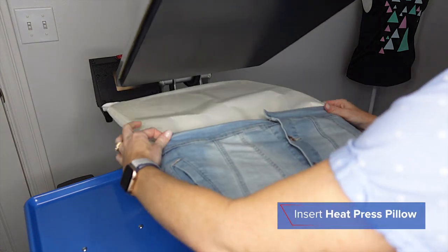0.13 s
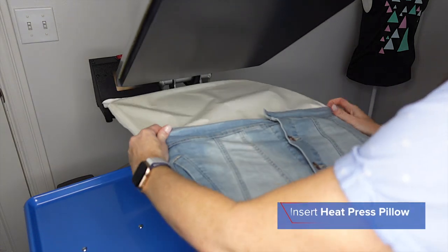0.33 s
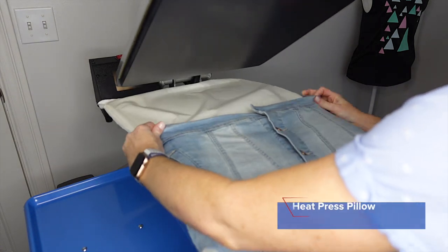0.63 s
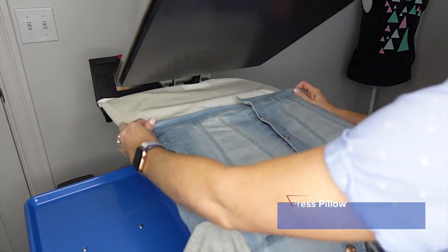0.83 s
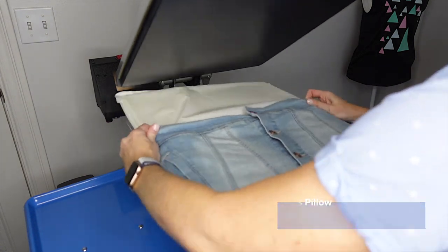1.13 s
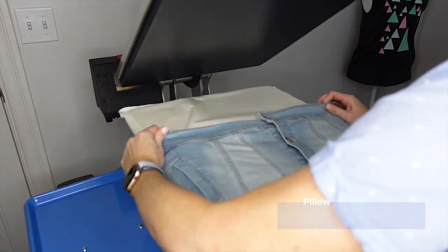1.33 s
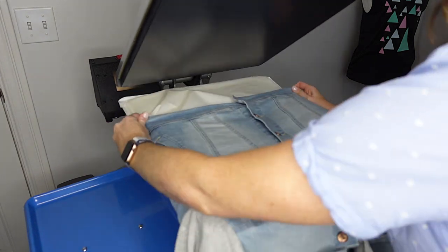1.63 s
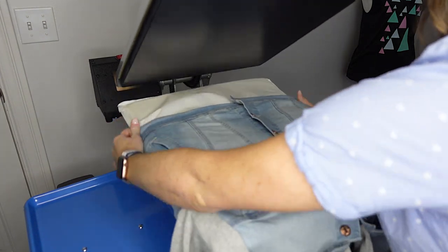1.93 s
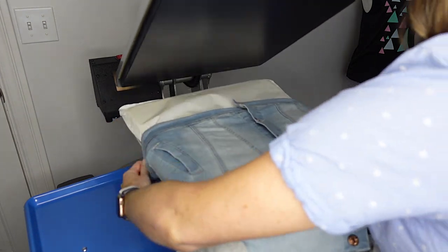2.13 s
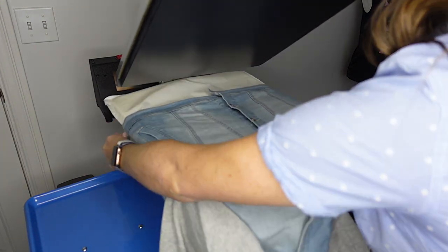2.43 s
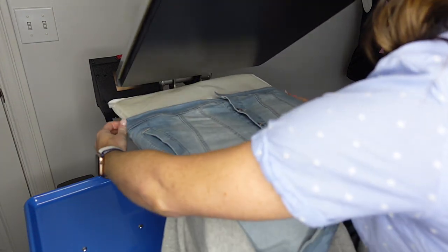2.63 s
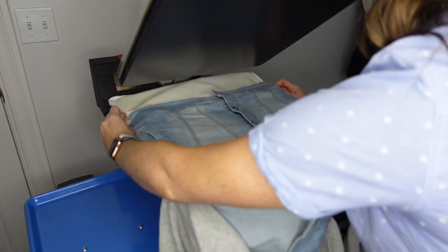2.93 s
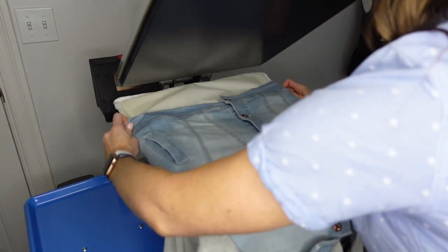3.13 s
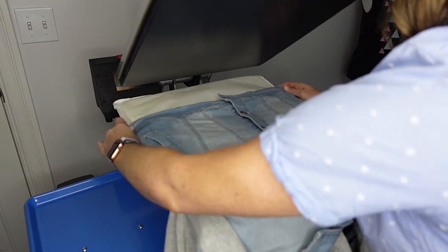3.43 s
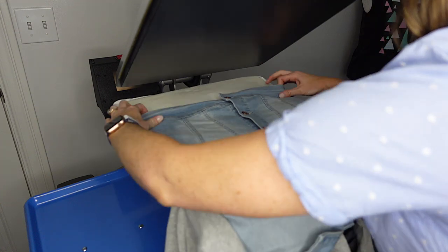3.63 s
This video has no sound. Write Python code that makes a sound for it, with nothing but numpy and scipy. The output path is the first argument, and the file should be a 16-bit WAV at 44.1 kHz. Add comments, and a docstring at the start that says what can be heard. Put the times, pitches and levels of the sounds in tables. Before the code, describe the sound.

Heavy denim rubbed and tugged over a padded plate, with dull fold pops and dry seam snaps

```python
"""Dull cloth rubbing and crumpling, close to the microphone in a small room, with a treble hiss from the weave.
A denim jacket is tugged and smoothed over the padded plate of a heat press: shaped noise and grains slide,
folds buckle as short sinking swings, seams snap as noise bursts, and scuffs drag in single bands.
Now and then the cloth sticks and slips in a short judder or squeak of wandering pitch.
Behind it lie a low handling rumble, faint room noise and a steady mains hum."""
import sys
import numpy as np
from scipy import signal
from scipy.fft import rfft, irfft, next_fast_len
from scipy.io import wavfile
from scipy.ndimage import map_coordinates

SR = 44100
rng = np.random.default_rng(int(sys.argv[2]) if len(sys.argv) > 2 else 0)


def generate_wav(sig):
    """Save sig (samples, or channels by samples) to the path in sys.argv[1] as 16-bit PCM at SR."""
    pcm = np.round(np.clip(np.atleast_2d(sig).T, -1, 1) * 32767).astype(np.int16)
    wavfile.write(sys.argv[1], SR, pcm)


N = 167580  # samples, 3.8 s

# Colour of the treble hiss of the weave. Each row: frequency in Hz, relative level in dB.
WEAVE_COLOUR = [(200, -18), (1500, 4), (2900, 1), (4400, 3), (6500, -3), (9000, -4), (13000, -0.5),
                (15800, -9.5)]


def amp(db):
    """Decibels to gain."""
    return 10 ** (np.asarray(db) / 20)


def unit(x):
    """Scale to rms 1."""
    return x / np.sqrt(np.mean(x ** 2) + 1e-20)


def curve(rows):
    """One value per sample, straight lines between (s, value) rows."""
    return np.interp(np.arange(N) / SR, *np.transpose(rows))


def wobble(rate):
    """A smooth random curve, rate knots a second."""
    knots = rng.standard_normal(4096)
    return map_coordinates(knots, [np.arange(N) * rate / SR], mode="wrap")


def coloured(x, points, tilt_db=0):
    """Causal minimum-phase filter through (Hz, dB) points; tilt_db per octave acts from 3 to 8 kHz."""
    m = 2 * next_fast_len(len(x))
    octave = np.log2(np.fft.rfftfreq(m, 1 / SR) + 1)
    hz, db = np.transpose(points)
    tilt_octaves = np.clip(octave, np.log2(3000), np.log2(8000)) - np.log2(3000)
    gain_db = np.interp(octave, np.log2(hz), db) + tilt_db * tilt_octaves
    # folding the cepstrum onto positive time makes the filter causal
    cepstrum = irfft(np.log(amp(gain_db)))
    cepstrum[1:m // 2] *= 2
    cepstrum[m // 2 + 1:] = 0
    return irfft(rfft(x, m) * np.exp(rfft(cepstrum)))[:len(x)]


def noise(points):
    """Coloured noise of rms 1."""
    return unit(coloured(rng.standard_normal(N), points))


def grains(rate, spread_db, points):
    """Random tiny impulses of uneven size, about rate a second, coloured, rms 1."""
    size_db = spread_db * np.minimum(rng.exponential(size=N), 4)
    sizes = amp(size_db) * rng.choice([-1, 1], N)
    struck = rng.random(N) < rate / SR
    return unit(coloured(sizes * struck, points))


def burst(shape):
    """Noise under an envelope, its spectrum flattened so that no frequency stands out."""
    z = rfft(rng.standard_normal(len(shape)) * shape, 2 * len(shape))
    flat = irfft(np.exp(1j * np.angle(z)))[:len(shape)]
    return flat * np.sqrt(np.sqrt(shape))


def add(track, s, sound):
    """Mix a sound into the track from time s."""
    i = max(round(s * SR), 0)
    track[i:i + len(sound)] += sound[:max(N - i, 0)]


def sliding():
    """Cloth over cloth: a dull rub with small crumples, the rasp of the ribs, and the hiss and tick of fibres."""
    # How hard the cloth rubs. Each row: time in seconds, level in dB before the layer trims.
    rub_level = [(0.0, -32), (0.09, -49), (0.12, -38.5), (0.26, -42), (0.29, -43), (0.34, -42.5),
                 (0.42, -44.5), (0.48, -36), (0.55, -36), (0.6, -46.5), (0.67, -44.5), (0.78, -37.5),
                 (0.92, -37.5), (0.96, -34.5), (1.03, -45), (1.085, -43), (1.12, -37), (1.28, -39),
                 (1.4, -41.5), (1.44, -36), (1.48, -41.5), (1.56, -31), (1.62, -40.5), (1.67, -36),
                 (1.86, -35.5), (1.9, -47.5), (2.05, -35.5), (2.16, -50.5), (2.27, -49), (2.32, -38.5),
                 (2.42, -36.5), (2.56, -48), (2.63, -47), (2.74, -58), (2.79, -52.5), (2.84, -44.5),
                 (2.95, -50.5), (3.09, -39), (3.25, -34), (3.36, -42), (3.41, -33), (3.55, -56),
                 (3.59, -41.5), (3.7, -43.5), (3.75, -52.5), (3.8, -41)]
    # Raspy upper mids, where ribs of the weave catch. Each row: time in seconds, level in dB before trims.
    rasp_level = [(0.0, -42.5), (0.09, -53), (0.18, -47.5), (0.26, -54.5), (0.47, -56), (0.6, -54),
                  (0.73, -49.5), (0.9, -53), (0.95, -45), (1.01, -56), (1.27, -46), (1.32, -49.5),
                  (1.47, -50), (1.51, -40.5), (1.61, -48.5), (1.79, -43), (1.92, -54.5), (2.07, -50.5),
                  (2.16, -59.5), (2.28, -63), (2.335, -46), (2.43, -49.5), (2.48, -53.5), (2.74, -64),
                  (2.88, -56.5), (3.02, -62), (3.05, -50.5), (3.36, -52), (3.39, -46.5), (3.55, -62),
                  (3.65, -75), (3.8, -72)]
    # Treble hiss of the weave. Each row: time in seconds, level in dB before trims.
    hiss_level = [(0.0, -50.5), (0.06, -71), (0.18, -56.5), (0.26, -75), (0.29, -62), (0.56, -63),
                  (0.59, -64.5), (0.73, -58.3), (1.0, -60), (1.23, -59), (1.34, -60.5), (1.59, -54.5),
                  (1.62, -58), (1.79, -54), (1.86, -54.5), (1.89, -64), (1.96, -65), (2.02, -58.5),
                  (2.08, -56), (2.13, -64), (2.27, -66.5), (2.34, -57), (2.41, -53.5), (2.48, -62),
                  (2.51, -57), (2.55, -62), (2.73, -67), (3.06, -62), (3.42, -61), (3.56, -64.5),
                  (3.62, -56), (3.69, -63.5), (3.75, -60.5), (3.8, -59.5)]
    # Colours of the rub and the rasp. Each row: frequency in Hz, relative level in dB.
    rub_colour = [(20, -15), (70, -14), (150, -6.5), (280, -1.5), (380, -2.5), (550, -1.5), (820, -3),
                  (1130, -16), (1550, -14.5), (2600, -28.5), (7000, -46)]
    rasp_colour = [(100, -0.5), (700, -8.5), (1400, 2), (2000, -3.5), (2700, -9.5), (4200, -16.5),
                   (7000, -22.5), (15000, -41)]

    rub = amp(-6.5) * noise(rub_colour) + amp(-3.3) * crumples()
    rasp = amp(-8) * noise(rasp_colour)
    rasp += amp(-2.5) * grains(520, 3.5, rasp_colour)  # ribs
    weave = amp(0.5) * noise(WEAVE_COLOUR)
    weave += amp(-8.5) * grains(450, 0.5, WEAVE_COLOUR)  # fibres

    grip_db = 1.66 * wobble(45)  # uneven grip moves all three layers together
    catch_db = 1.8 * wobble(130)  # the ribs catch in quick clumps
    rub *= amp(curve(rub_level) + grip_db)
    rasp *= amp(curve(rasp_level) + 0.67 * grip_db + catch_db)
    weave *= amp(curve(hiss_level) + 0.5 * grip_db)
    return rub + rasp + weave


def crumples():
    """Countless small folds of random pitch and size, rms 1."""
    # Middle pitch of the crumples, higher when the cloth is taut. Each row: time in seconds, pitch in Hz.
    middle_pitch = [(0, 520), (.9, 574), (1.15, 700), (1.35, 477), (2.05, 500), (2.42, 670), (2.85, 516),
                    (3.1, 750), (3.25, 620), (3.8, 655)]
    per_second, spread_db, pitch_octaves, length_cycles = 330, 2.1, 0.55, 1.0

    out, t = np.zeros(N), np.arange(-SR // 100, SR // 100) / SR
    for when, size, phase, *chance in rng.random((int(per_second * N / SR), 6)):
        s = when * N / SR
        octaves = pitch_octaves * np.sum(2 * np.array(chance) - 1)  # three draws, so mostly near the middle
        hz = np.interp(s, *np.transpose(middle_pitch)) * 2 ** octaves
        level_db = -spread_db * np.log(size + 0.061)  # few large, many small
        add(out, s, amp(level_db) * swing(t, hz, length_cycles, phase))
    return unit(out)


def swing(t, hz, length, phase):
    """One fold flipping over: a short swing of air with sinking pitch and no ring."""
    rise_share = 0.73  # the rise is this share of the swing length
    pitch_fall = 0.17  # share of the pitch lost over one swing length as the fold relaxes
    cycles = hz * t
    swell = np.exp(-(cycles / length / np.where(t < 0, rise_share, 1)) ** 2)
    sunk_cycles = cycles - pitch_fall * cycles ** 2 / length / 2
    return swell * np.cos(2 * np.pi * (sunk_cycles + phase))


def press(x):
    """The rubbing sets the body of the press ringing faintly in a few decaying modes."""
    # Resonances of the press. Each row: frequency in Hz, relative level in dB, 60 dB decay time in seconds.
    modes = [(279, -1, .16), (533, -7, .07)]
    t = np.arange(SR // 4) / SR
    ring = np.zeros(len(t))
    for hz, db, t60 in modes:
        evened = 2 * np.log(1000) / (t60 * SR)  # long and short modes answer alike at their own pitch
        ring += amp(db - 60 * t / t60) * np.cos(2 * np.pi * hz * t) * evened
    return x + signal.fftconvolve(x, ring)[:N]


def folds():
    """Big stiff folds buckle, each a short swing of air, one or a few cycles long, heard as a dull pop."""
    # Each row: middle in seconds, level in dB before the trim, pitch in Hz, swing length in cycles.
    pops = [(0.0602, -23, 630, 0.55), (.172, -24, 560, 1.2), (.212, -10.5, 482, 0.68),
            (0.2967, -19, 480, 0.51), (.3295, -26, 840, 0.42), (0.371, -22.5, 590, 1.4),
            (0.4034, -20.5, 517, 0.69), (0.4618, -13.5, 530, 0.9), (.5441, -22.5, 560, 0.87),
            (0.6236, -23, 950, 0.67), (0.7303, -31, 453, .7), (0.7937, -19.5, 607, 1.07),
            (0.8395, -19.5, 556, 1.14), (.9262, -23, 696, 0.78), (0.9433, -19, 617, 1.15),
            (1.0577, -22.5, 696, 0.96), (1.0837, -20.5, 640, 0.78), (1.1092, -15, 720, 0.88),
            (1.139, -18.5, 870, 0.47), (1.1738, -13.5, 765, 0.59), (1.183, -19.5, 510, 0.34),
            (1.263, -28.5, 544, 1.6), (1.2789, -18.5, 480, 0.49), (1.435, -21, 400, 0.9),
            (1.517, -22, 515, 1.2), (1.551, -19, 440, 0.42), (1.5553, -17, 472, 0.9), (1.574, -21, 540, .8),
            (1.6355, -22.5, 590, 0.84), (1.8007, -13.5, 600, 0.9), (1.809, -24, 560, 0.45),
            (1.8471, -23, 680, 0.78), (1.894, -24.5, 645, .6), (1.94, -25, 676, 0.66),
            (1.9702, -19, 786, 1.2), (2.0166, -20, 685, 0.69), (2.0492, -19, 790, 1.2),
            (2.0528, -17, 398, 0.54), (2.3935, -22.5, 905, 1.6), (2.4128, -18, 686, 0.61),
            (2.4345, -20, 745, 1), (2.6208, -27, 795, 1.13), (2.8283, -23, 580, 0.69),
            (2.858, -30, 550, 0.45), (2.93, -32, 490, 0.86), (2.996, -34, 790, 0.94),
            (3.037, -25, 600, 0.5), (3.0645, -19, 760, 1), (3.0942, -23, 785, 2.1),
            (3.1415, -21.5, 660, 0.78), (3.176, -27, 560, 0.46), (3.264, -19, 640, 0.78),
            (3.293, -23, 620, 0.7), (3.354, -26, 900, 0.46), (3.4102, -25, 603, 0.82),
            (3.4565, -24.5, 830, 1.9), (3.6875, -19.5, 525, 0.38), (3.7127, -22.5, 674, 0.59)]
    trim_db = -2.5
    out, t = np.zeros(N), np.arange(-SR // 100, SR // 100) / SR
    for (s, db, hz, length), phase in zip(pops, rng.random(len(pops))):
        add(out, s + t[0], amp(db + trim_db) * swing(t, hz, length, phase))
    return out


def scuffs():
    """Short scuffs of fingers and hems: a brief drag of noise swells and fades in one band."""
    # Each row: middle in seconds, length in seconds, centre in Hz, level in dB before the trim.
    drags = [(.122, 0.012, 950, -40), (0.291, 0.041, 645, -35), (.329, 0.0064, 1640, -37),
             (.37, 0.022, 1600, -44.5), (.785, 0.042, 600, -36.5), (0.794, 0.024, 1840, -38.5),
             (.925, 0.0099, 2030, -38.5), (.95, .045, 3600, -49.5), (1.049, 0.026, 1620, -45),
             (1.15, 0.074, 980, -45), (1.266, 0.025, 1940, -43.5), (1.556, 0.017, 1860, -39),
             (1.558, 0.022, 288, -41), (2.261, .008, 1740, -46), (2.365, 0.06, 243, -38),
             (2.385, 0.032, 510, -37.5), (2.39, 0.026, 1070, -40), (2.413, 0.0069, 1110, -33),
             (2.431, 0.017, 1130, -40), (2.482, 0.0056, 1870, -38.5), (2.595, 0.017, 247, -39),
             (2.656, .014, 1750, -48.5), (2.775, .012, 594, -43.5), (1.5, .05, 2000, -46.5),
             (3.059, 0.032, 1040, -37), (3.146, 0.017, 940, -36.5), (3.239, 0.048, 335, -39),
             (3.342, 0.025, 138, -35.5), (3.39, 0.012, 1390, -30), (3.39, .016, 480, -29),
             (3.41, 0.041, 347, -42), (3.6, 0.079, 4500, -63), (3.62, .035, 12500, -56.5),
             (3.643, 0.0076, 2100, -48), (3.689, 0.015, 318, -34.5), (3.755, .08, 4500, -63)]
    # Band of a scuff. Each row: multiple of the centre frequency, relative level in dB.
    band = [(.1, -44), (.4, -26), (.75, -4), (1, 1.5), (1.25, -10), (1.7, -26), (4, -36), (12, -51)]
    trim_db = -4.5
    out = np.zeros(N)
    for s, length, hz, db in drags:
        swell = np.hanning(int(length * SR))
        padded = np.pad(burst(swell), (0, SR // 50))  # room for the filter to die away
        drag = coloured(padded, np.array(band) * [hz, 1])
        drag *= np.sqrt(len(swell)) / np.linalg.norm(drag)
        add(out, s - length / 2, amp(db + trim_db) * drag)
    return out


def seams():
    """A caught seam lets go with a short, dry, broad crack, each a little different in colour."""
    # Seams and threads. Each row: start in seconds, level in dB before the trim, treble tilt in dB per octave.
    snaps = [(.107, -25.5, -0.5), (0.1753, -24, 0.5), (0.2948, -31.5, 0), (0.4613, -32.5, -5),
             (0.544, -30.5, 4), (.697, -30.5, -4), (0.7934, -29, 1), (0.9256, -23.5, -2), (.943, -35, -4),
             (1.0383, -30.5, -9), (1.0568, -35, 9), (1.109, -33.5, 8), (1.139, -34.5, -6), (1.2313, -31, 4),
             (1.4786, -27.5, -8), (1.7265, -36.5, 9), (1.749, -31.5, 0), (1.777, -31, 6),
             (1.848, -29.5, -4), (2.015, -31.5, -8), (2.0486, -27.5, 0), (2.4147, -42, 20),
             (3.0473, -30.5, 10.5), (3.2252, -26.5, 11), (3.2714, -29, 4.5), (3.404, -33, 2)]
    # Colour of a crack. Each row: frequency in Hz, relative level in dB.
    crack_colour = [(30, -24), (200, -1), (700, 9.5), (2000, 10.5), (2800, 2.5), (4200, 3.5), (6500, -11),
                    (11000, -17.5), (15800, -21)]
    decay_s, trim_db, uneven_db = 0.0017, -5.5, 2.2  # decay of the envelope given to burst()
    out, t = np.zeros(N), np.arange(SR // 50) / SR
    for s, db, tilt in snaps:
        uneven = [0, uneven_db] * rng.standard_normal((len(crack_colour), 1))
        crack = coloured(burst(np.exp(-t / decay_s)), np.array(crack_colour) + uneven, tilt)
        add(out, s, amp(db + trim_db) * 7 * crack / np.linalg.norm(crack))
    return out


def judders():
    """Taut cloth sticks and slips quickly in a short judder or squeak of wandering pitch and force."""
    # Each row: start in seconds, length in seconds, first pitch in Hz, last pitch in Hz, middle level in dB.
    slides = [(.474, .04, 590, 520, -31), (.951, .015, 550, 640, -23), (1.405, .028, 920, 570, -29.5),
              (1.443, .018, 490, 660, -28.5), (1.557, .02, 2950, 3450, -44), (3.385, .0105, 730, 830, -20)]
    pitch_wander, rough_db = 0.055, 1.7  # share of the pitch, dB
    out = np.zeros(N)
    for s, length, first_hz, last_hz, db in slides:
        u = np.linspace(0, 1, int(length * SR))
        glide = first_hz + (last_hz - first_hz) * u
        hz = glide * (1 + pitch_wander * wobble(first_hz)[:len(u)])
        phase = 2 * np.pi * np.cumsum(hz) / SR
        slips = np.sin(phase) + amp(-30) * np.sin(2 * phase)
        slips += amp(-27.5) * noise(WEAVE_COLOUR)[:len(u)]
        force = amp(db + rough_db * wobble(first_hz)[:len(u)])
        swell = np.sqrt(np.abs(np.sin(np.pi * u)))
        add(out, s, force * swell * slips)
    return out


def room(x):
    """A few near echoes and a short tail of decaying noise."""
    # Echoes from the raised lid and the walls. Each row: delay in seconds, level in dB.
    echoes = [(.0062, -30), (.0094, -31)]
    t60_s, build_s, tail_db = 0.13, 0.0048, -13.5
    t = np.arange(SR // 3) / SR
    tail = rng.standard_normal(len(t)) * amp(-60 * t / t60_s) * (1 - np.exp(-t / build_s))
    answer = amp(tail_db) * tail / np.linalg.norm(tail)
    for delay, db in echoes:
        add(answer, delay, amp([db]))
    return x + signal.fftconvolve(x, answer)[:N]


def handling_rumble():
    """Soft low bumps and rumble of the handling: low noise under a moving level."""
    # Each row: time in seconds, level in dB before the trim.
    rumble_level = [(0, -49), (.15, -57), (.4, -56), (.9, -52), (1.4, -51), (1.57, -44), (1.8, -48),
                    (2.05, -49), (2.15, -54), (2.3, -53), (2.37, -42.5), (2.47, -52), (2.75, -60), (3, -59),
                    (3.15, -52), (3.4, -50), (3.5, -57), (3.8, -58)]
    # Each row: frequency in Hz, relative level in dB.
    rumble_colour = [(15, -9), (30, 3.5), (50, 0.5), (90, -4), (200, -9.5), (400, -41), (1000, -62)]
    trim_db = 2.5
    return noise(rumble_colour) * amp(curve(rumble_level) + trim_db + 1.8 * wobble(18))


def mains_hum():
    """A steady sine, the hum of the mains."""
    hum_hz, peak_db = 120.5, -56.5
    return amp(peak_db) * np.sin(2 * np.pi * hum_hz * np.arange(N) / SR)


def room_noise():
    """The faint steady noise of the room."""
    # Each row: frequency in Hz, relative level in dB.
    air_colour = [(20, 8), (45, 5.5), (90, 5), (220, -2.5), (600, -19), (1200, -11), (2500, -32),
                  (7000, -24.5), (12500, -23), (15500, -24.5)]
    return amp(-56) * noise(air_colour)  # rms level in dB


def scene():
    """The cloth in the room, with handling rumble, hum and room noise."""
    cloth = room(press(sliding()) + folds() + scuffs() + seams() + judders())
    background = handling_rumble() + mains_hum() + room_noise()
    return (cloth + background)[None]


def record(dry):
    """The recorder keeps nothing above its band limit."""
    top_hz = 15750
    m = next_fast_len(N + SR // 2)
    kept = np.fft.rfftfreq(m, 1 / SR) < top_hz
    return irfft(rfft(dry, m) * kept, m)[..., :N]


dry = scene()
out = record(dry)
generate_wav(out)
```